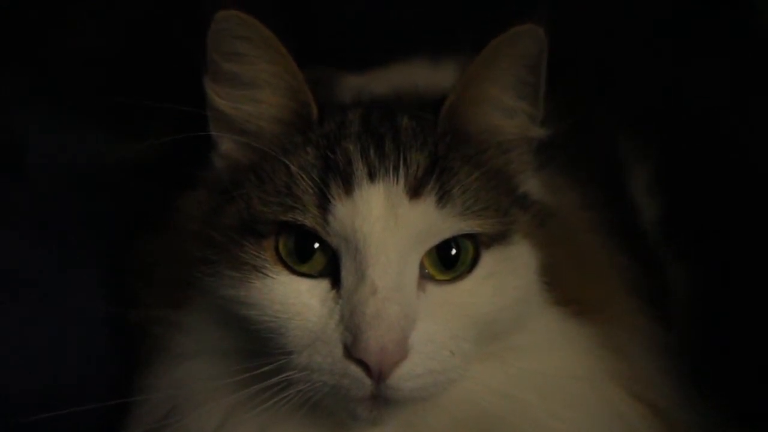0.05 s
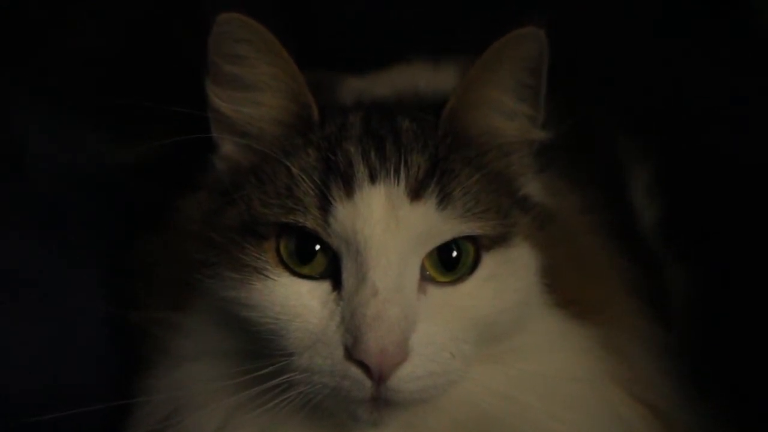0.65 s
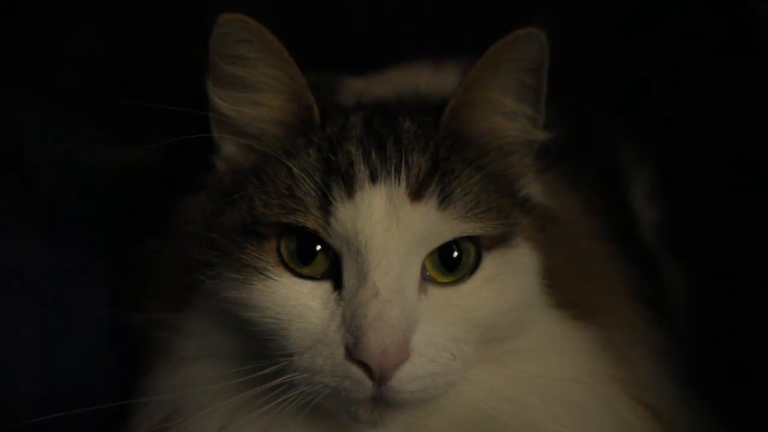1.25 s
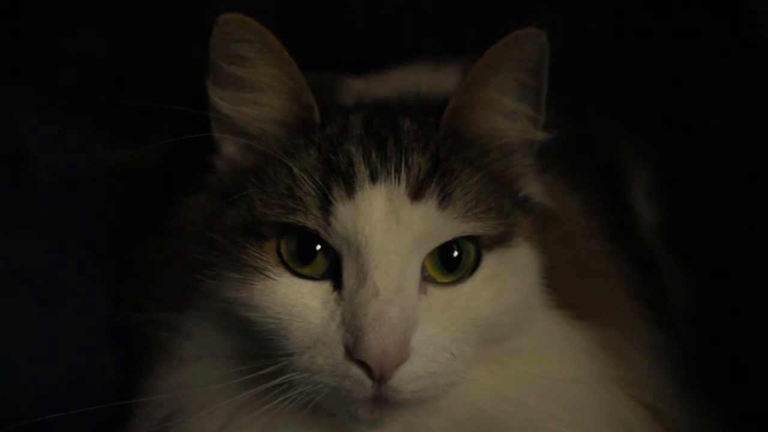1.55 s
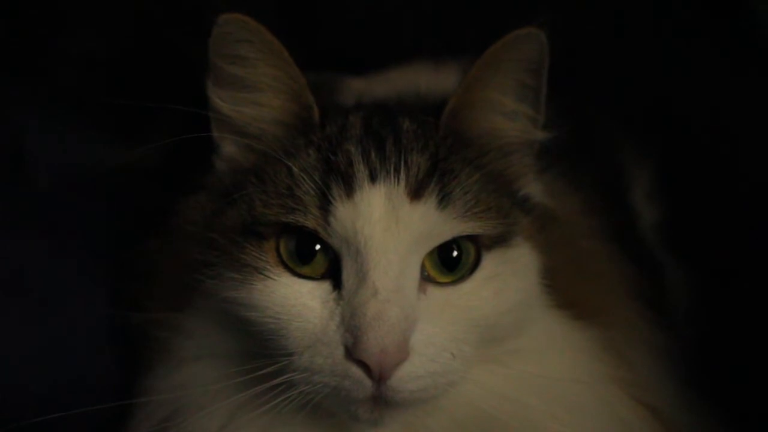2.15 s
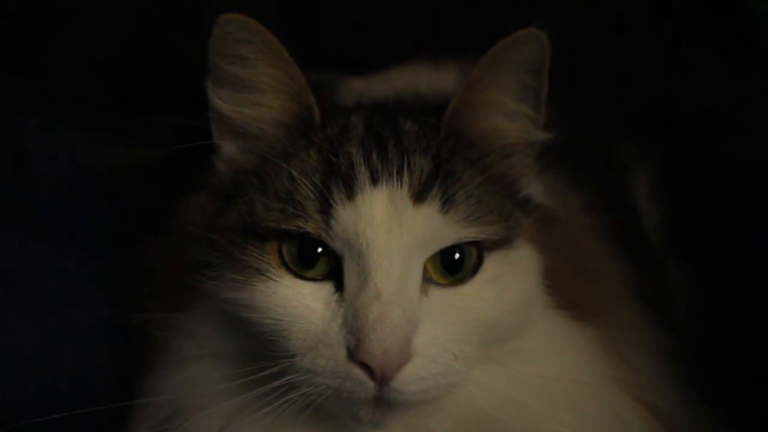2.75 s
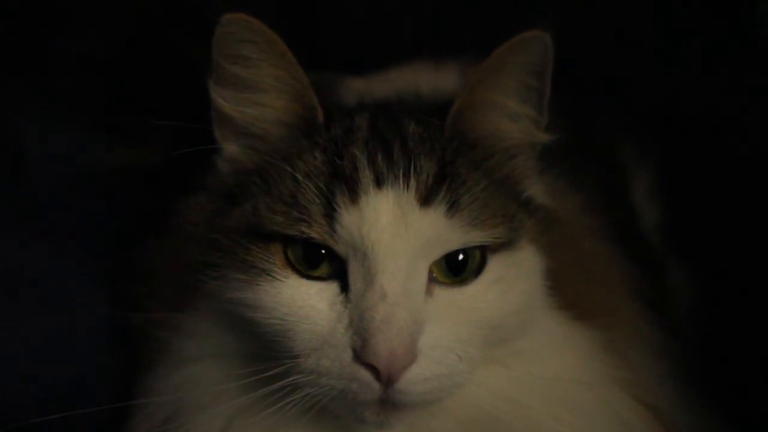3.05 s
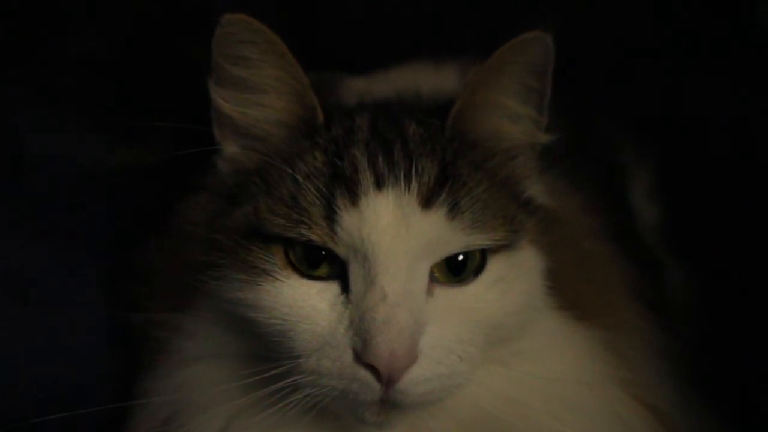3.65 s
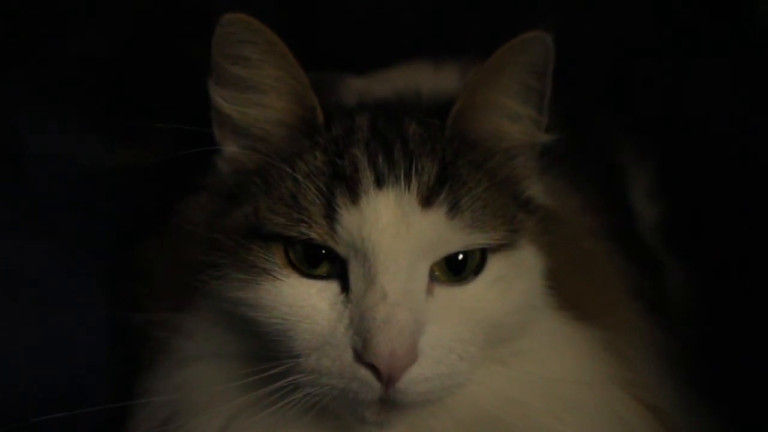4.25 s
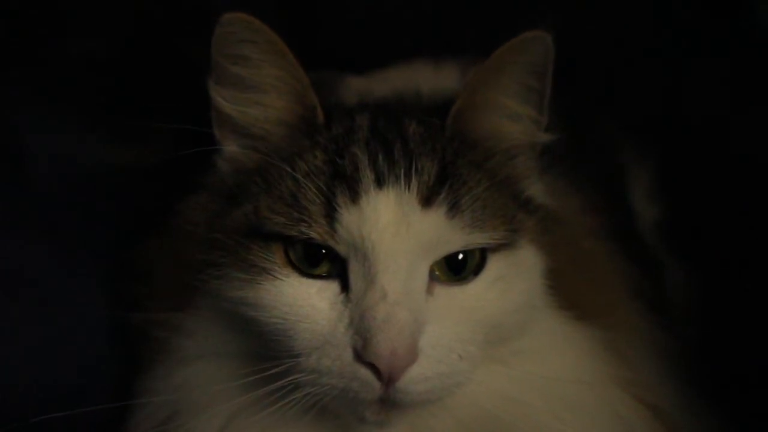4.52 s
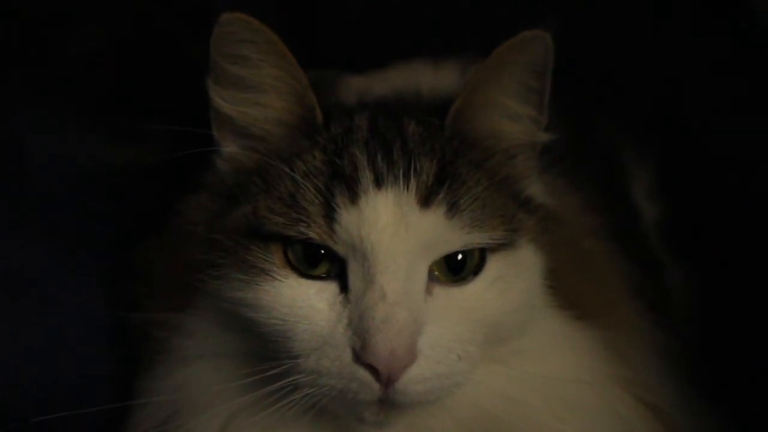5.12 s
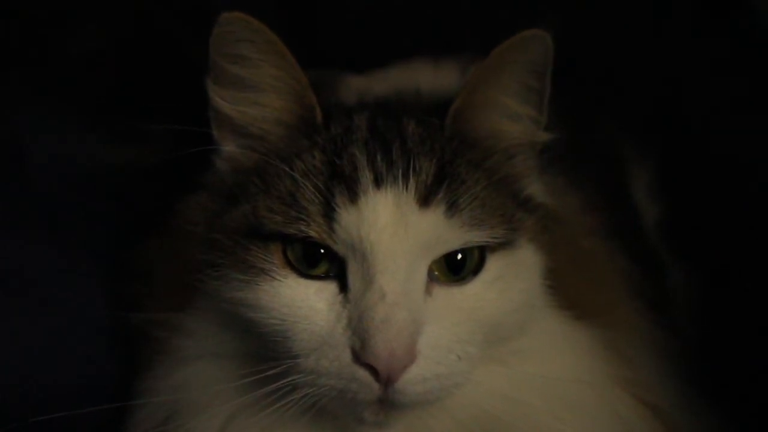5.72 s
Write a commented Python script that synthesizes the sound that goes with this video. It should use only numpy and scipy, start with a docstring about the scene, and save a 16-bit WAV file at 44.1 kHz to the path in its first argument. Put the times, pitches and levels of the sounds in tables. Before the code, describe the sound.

A nighttime chorus of crickets outdoors, with one nearby insect pulsing quickly on the right and distant insects sizzling behind.

```python
"""Crickets on a still night

Tree crickets chirp with their wings near 2.2 kHz and an octave above; one close on the right pulses
about eight times a second among steadier trills. A far crowd of insects merges into a sizzle around
8 kHz, and a katydid's wing strokes tick very high in two bouts. Faint peeps, scratchy calls and a few
tiny snaps sit over a low rumble of air."""
import sys
import numpy as np
from scipy import signal
from scipy.fft import rfft, irfft
from scipy.io import wavfile

SR = 44100
rng = np.random.default_rng(int(sys.argv[2]) if len(sys.argv) > 2 else 0)


def waveform_to_disk(signal):
    """Save audio, clipped to [-1, 1], as 16-bit WAV at the path in sys.argv[1]."""
    frames = np.transpose(np.atleast_2d(signal))
    scaled = np.clip(frames, -1, 1) * 32767
    samples = np.round(scaled).astype(np.int16)
    wavfile.write(sys.argv[1], SR, samples)


N = 254898
TIME = np.arange(N) / SR
BIN_HZ = np.maximum(np.fft.rfftfreq(N, 1 / SR), 1)

# Levels are relative, ahead of each layer's gain; pan is left minus right.
# stereo image of the noise beds: f/Hz, left-right correlation
STEREO_LIKENESS = [(12, 0.77), (30, 0.65), (80, 0.48), (160, 0.059), (1300, 0.18), (1750, 1), (2200, 0.52),
                   (2600, 1), (3600, 0.98), (4250, 0.54), (5000, 0.11), (6500, 0.14), (7400, 0.35),
                   (10000, 0.14), (15000, 0.026)]
# colours of the air's rumble, the hush and the far sizzle: f/Hz, level/dB
AIR_COLOUR = [(6, 0), (15, 2.5), (30, -1.5), (50, -6.5), (63, -9), (80, -15.5), (120, -21), (180, -25.5),
              (300, -28), (600, -33), (1200, -38), (1800, -37.5)]
HUSH_COLOUR = [(150, -12), (400, -1), (1000, 4), (1500, -3.5), (2600, -37), (3300, -34), (8000, -6),
               (15500, -1)]
SIZZLE_COLOUR = [(3700, -62), (4700, -19.5), (5200, -18), (6000, -10.5), (6550, -6.5), (7000, -5.5),
                 (7600, -0.8), (8100, 0), (8700, -2), (9300, -9.5), (10000, -16.5), (11300, -26),
                 (13000, -37.5), (15500, -38.5)]
# fader rides of the rumble and the sizzle: t/s, level/dB
AIR_RIDE = [(0, -51), (.6, -53), (1.2, -52.5), (2.2, -53), (3.3, -52.5), (4.2, -51.5), (5.0, -53.5),
            (5.78, -52)]
SIZZLE_RIDE = [(0.0, -39.5), (0.03, -41), (5.52, -41), (5.78, -40)]
# swell of the cricket chorus: t/s, fundamental level/dB, octave level/dB, pitch rise/Hz
CHORUS_SWELL = [(0, -55.5, -57, 0), (.4, -60, -58.5, -25), (1.0, -59.5, -70, -35), (1.6, -60, -58.5, -35),
                (2.1, -58.5, -54, -20), (2.5, -56, -52, 10), (3.0, -55.5, -51, 25), (3.5, -54, -51, 25),
                (3.9, -55, -52.5, 10), (4.3, -57.5, -55, -15), (4.9, -57.5, -56.5, -20),
                (5.4, -57, -55.5, -5), (5.78, -55.5, -56.5, 9)]
# colours of the chorus's two bands: f/Hz, level/dB
CHORUS_LOW_COLOUR = [(1500, -29), (1680, -20), (1830, -8.5), (1970, -9), (2100, -0.5), (2230, 3.5),
                     (2320, -4.5), (2420, -15.5), (2700, -16.5), (3000, -23)]
CHORUS_OCTAVE_COLOUR = [(3600, -107), (3780, -8.5), (3950, -8), (4120, -1.5), (4300, 1.5), (4420, 6.5),
                        (4520, -6.5), (4620, -7.5), (4760, -7), (5200, -50)]
# distant peeps: t/s, level/dB, f/Hz, half length/s
FAR_PEEPS = [(1.973, -59, 3640, 0.09), (2.69, -56, 3450, 0.021), (2.89, -67, 3460, 0.049),
             (3.42, -58, 3420, 0.024), (3.56, -66, 3470, .025)]
# distant scratchy calls: t/s, level/dB, half length/s
FAR_SCRATCHES = [(0.175, -57.5, 0.037), (0.46, -68, 0.15), (0.79, -61, 0.018), (0.873, -63, 0.081),
                 (2.05, -68, 0.014), (2.75, -59, 0.029), (5.271, -62, 0.05), (5.43, -69, 0.063),
                 (5.622, -60.5, 0.066)]
# colour of those calls: f/Hz, level/dB
SCRATCH_COLOUR = [(2500, -30), (2900, -3.5), (3300, -5), (3600, 3.5), (3850, -29)]
# tiny snaps: t/s, level/dB
SNAPS = [(4.344, -52), (4.671, -46), (4.676, -49), (5.1363, -53)]
# colour of the katydid's rasp: f/Hz, level/dB
KATYDID_COLOUR = [(9500, -22), (11000, -11), (11400, -5), (11750, -9), (12100, -10), (12500, -6),
                  (12850, -12), (14500, -31)]
# its bouts: start/s, end/s, first stroke period/s, level/dB, fade-in/s
STROKE_BOUTS = [(-0.019, 1.22, 0.04335, -42.5, 0.02), (3.994, 5.21, 0.04414, -41, 0.26)]
# four trills (clear; lower and soft; thin and high; joining late): t/s, f/Hz, level/dB, pan/dB
TRILL_CLEAR = [(0, 4420, -67, -1), (.4, 4425, -48, -7), (.55, 4440, -48.5, -8), (.9, 4435, -44, -5),
               (1.5, 4400, -46, -8.5), (2.1, 4385, -51.5, -10), (2.4, 4370, -69, -14), (4.0, 4370, -61, 4),
               (4.25, 4390, -48, 8), (4.6, 4385, -53, 9), (4.8, 4360, -53, 12), (5.4, 4345, -54, 5),
               (5.78, 4315, -48.5, 1)]
TRILL_SOFT = [(0, 4200, -59, -16), (.18, 4216, -50.5, -6), (.3, 4180, -63, 3), (.55, 4120, -58, -6),
              (1.0, 4146, -52, 2), (1.5, 4080, -69, -2), (2.2, 4150, -69, -1), (2.8, 4200, -57, -7),
              (3.7, 4230, -49.5, -2), (4.2, 4080, -61, -2), (5.3, 4190, -61.5, -16), (5.78, 4200, -69, 0)]
TRILL_THIN = [(0, 4710, -76, -3), (1.2, 4500, -74, -6), (4.08, 4600, -67, 0), (4.17, 4730, -58, -4),
              (4.62, 4717, -56, -11), (4.8, 4603, -61, 0), (5.78, 4630, -78, 0)]
TRILL_LATE = [(0, 4620, -83, 10), (4.6, 4615, -69, 11), (4.76, 4600, -57, -14), (5.3, 4600, -57.5, -3),
              (5.48, 4550, -54, -7), (5.58, 4460, -53, -11), (5.78, 4620, -51, 3.5)]
# phrasing of a far tree cricket and its lower, slower neighbour: t/s, level/dB, f/Hz
FAR_PHRASE = [(0.0, -61, 2240), (0.55, -47, 2213), (1.15, -43.5, 2213), (1.7, -48.0, 2190),
              (2.4, -48, 2205.0), (2.9, -46, 2230.0), (3.25, -46.5, 2288), (3.9, -45.5, 2286),
              (4.25, -49.0, 2234), (4.8, -47, 2241), (5.78, -50, 2225.0)]
LOW_PHRASE = [(0.0, -48.5, 2083), (0.7, -49, 2075.0), (1.4, -50, 2064), (1.95, -52.5, 2054),
              (2.4, -47.5, 2124), (2.9, -44, 2124), (3.4, -45.5, 2127), (3.85, -48.0, 2097),
              (4.25, -47.5, 2080.0), (4.7, -44, 2068), (5.2, -48.5, 2075.0), (5.78, -53, 2070)]
# phrasing of the close cricket: t/s, level/dB, f/Hz, pan/dB
CLOSE_PHRASE = [(0.12, -52, 4250, -3), (0.24, -41, 4290, -3), (0.35, -36, 4375, -6), (0.62, -44, 4425, -9),
                (0.8, -44, 4430, -10), (0.92, -37, 4425, -9), (1.2, -36.5, 4400, -8),
                (1.5, -37.5, 4400, -8), (1.78, -42, 4380, -10), (2.35, -37, 4360, -9),
                (3.4, -35.5, 4350, -5), (4.0, -38.5, 4350, -9), (4.6, -52, 4370, -2), (5.3, -48, 4355, 0),
                (5.7, -37.5, 4320, 2)]
# pace of these three; the farther two hurry as the chorus swells: t/s, chirp rate/Hz
FAR_PACE = [(0.0, 8.73), (0.55, 8.72), (1.15, 8.8), (1.7, 8.2), (2.4, 8.04), (2.9, 9.23), (3.25, 9.28),
            (3.9, 8.87), (4.25, 9.07), (4.8, 8.18), (5.78, 8.14)]
LOW_PACE = [(0.0, 8.12), (0.7, 7.65), (1.4, 6.88), (1.95, 6.85), (2.4, 8.94), (2.9, 8.22), (3.4, 8.14),
            (3.85, 6.71), (4.25, 8.41), (4.7, 6.71), (5.2, 7.0), (5.78, 7.22)]
CLOSE_PACE = [(0.92, 8.97), (1.25, 8.63), (1.8, 8.29), (3.4, 8.17), (4.0, 8.42), (4.6, 8.38), (5.3, 8.2)]
# colour of the scrape around the close cricket's tone: f/Hz, level/dB
SCRAPE_COLOUR = [(3800, -18), (4000, 14), (4200, -5), (4500, 7), (4650, 4), (4800, -19)]


def from_db(db):
    """Decibels to gain."""
    return 10 ** (np.asarray(db) / 20)


def unit_rms(x):
    """Scale to unit power."""
    return x / np.sqrt(np.mean(x ** 2) + 1e-20)


def in_time(rows):
    """Each column of an automation curve at every sample."""
    s, *columns = np.transpose(rows)
    return [np.interp(TIME, s, column) for column in columns]


def per_bin(points):
    """A curve over frequency, joined on a log axis."""
    hz, value = np.transpose(points)
    return np.interp(np.log(BIN_HZ), np.log(hz), value)


def panned(pan_db):
    """Left and right gains; positive leans left."""
    return from_db(np.array([[.5], [-.5]]) * pan_db)


def bump(s, half_s):
    """A bell-shaped swell of height 1."""
    return np.exp(-.5 * np.minimum(((TIME - s) / half_s) ** 2, 100))


def drift(rate_hz):
    """A random modulator of spread 1, moving mostly below the given rate."""
    return unit_rms(irfft(rfft(rng.standard_normal(N)) / (1 + (BIN_HZ / rate_hz) ** 2), N))


def wash(colour):
    """Stereo noise of unit power, rolled off past both ends of its colour curve."""
    mid, side = rfft(rng.standard_normal((2, N)))
    alike = np.clip(per_bin(STEREO_LIKENESS), -.98, .98)
    pair = np.sqrt(1 + alike) * mid + np.sqrt(1 - alike) * side * [[1], [-1]]
    low_hz, high_hz = np.array(colour)[[0, -1], 0]
    skirts = 1 / np.sqrt((1 + (low_hz / BIN_HZ) ** 8) * (1 + (BIN_HZ / high_hz) ** 8))
    return unit_rms(irfft(pair * skirts * from_db(per_bin(colour)), N))


def raised(x, rise_hz):
    """Slide every pitch in a sound by a moving number of hertz."""
    return np.real(signal.hilbert(x) * np.exp(2j * np.pi * np.cumsum(rise_hz) / SR))


def roughened(x, flutter_db, slip_rad, rate_hz):
    """Uneven teeth on the wing's file shake the strength and phase of the tone."""
    flutter = from_db(flutter_db * drift(rate_hz))
    slip = np.exp(1j * slip_rad * drift(rate_hz))
    return np.real(signal.hilbert(x) * flutter * slip)


def garden(x, wet_db, t60_s, width):
    """Walls and foliage scatter a short tail, partly different in each ear."""
    t = TIME[:SR // 2]
    mid, side = rng.standard_normal((2, len(t)))
    tail = (mid + width * side * [[1], [-1]]) * from_db(-60 * t / t60_s) * (t > .012)  # pre-delay
    tail /= np.sqrt(np.sum(tail ** 2, axis=1, keepdims=True))
    return x + from_db(wet_db) * signal.fftconvolve(x, tail, axes=1)[:, :N]


def chirp(s, peak_db, hz, half_s, skirt, sag_hz):
    """A burst of wing tone: a strong core between weaker strokes, sagging in pitch as the wing slows."""
    out = np.zeros(N)
    span = slice(max(0, int((s - .1) * SR)), int((s + .1) * SR))
    t = (TIME[span] - s) / half_s
    swell = (np.exp(-.5 * t ** 2) + skirt * np.exp(-.5 * (t / 1.5) ** 2)) / (1 + skirt)
    pitch = hz - sag_hz * np.tanh(t)
    out[span] = from_db(peak_db) * swell * np.sin(2 * np.pi * (np.cumsum(pitch) / SR + rng.random()))
    return out


def chirp_train(phrase, pace, first_s, uneven_db, stray_hz):
    """One chirp per beat, each a little different: rows of t/s, level/dB, f/Hz."""
    rate, = in_time(pace)
    level_db, hz, *_ = in_time(phrase)
    beats = np.cumsum(rate) / SR
    beats -= np.interp(first_s, TIME, beats)
    s = np.interp(np.arange(np.ceil(beats[-1])), beats, TIME)
    chance = rng.standard_normal((len(s), 2))
    peak_db = np.interp(s, TIME, level_db) + uneven_db * chance[:, 0]
    pitch_hz = np.interp(s, TIME, hz) + stray_hz * chance[:, 1]
    return np.transpose([s, peak_db, pitch_hz])


def night_air():
    """The bed: a low rumble of moving air and a soft, even hush."""
    level_db, = in_time(AIR_RIDE)
    return from_db(level_db + 3.5) * wash(AIR_COLOUR) + from_db(-68) * wash(HUSH_COLOUR)


def sizzle():
    """A far crowd of high-pitched insects merges into one shimmering band."""
    level_db, = in_time(SIZZLE_RIDE)
    return from_db(level_db + 2 + .37 * drift(40)) * wash(SIZZLE_COLOUR) * panned(1.15)


def chorus():
    """Many crickets blur into two throbbing bands an octave apart, rising in pitch as they swell."""
    low_db, octave_db, rise_hz = in_time(CHORUS_SWELL)
    low = from_db(low_db - .7 + 2.4 * drift(23)) * raised(wash(CHORUS_LOW_COLOUR), rise_hz)
    octave = from_db(octave_db + 2.5 + drift(25)) * raised(wash(CHORUS_OCTAVE_COLOUR), 2 * rise_hz)
    return low * panned(-1.1) + octave * panned(.5)


def faint_callers():
    """Wavering peeps and short scratchy calls from far away."""
    peeps = sum(chirp(s, db, hz, half_s, skirt=.07, sag_hz=17) for s, db, hz, half_s in FAR_PEEPS)
    bursts = sum(from_db(db) * bump(s, half_s) for s, db, half_s in FAR_SCRATCHES)
    scratches = bursts * from_db(2.4 * drift(36) - 3.5) * wash(SCRATCH_COLOUR)
    calls = roughened(peeps, flutter_db=5.5, slip_rad=.96, rate_hz=27) + scratches
    return from_db(-2) * garden(calls, wet_db=-12, t60_s=.81, width=.2)


def snaps(gain_db=7, decay_s=.0006):
    """Tiny dry snaps, heard only in the top octave."""
    envelope = sum(from_db(db) * (TIME > s) * np.exp(-np.abs(TIME - s) / decay_s) for s, db in SNAPS)
    top = signal.butter(2, 10500, "high", fs=SR, output="sos")
    return from_db(gain_db) * panned(2) * signal.sosfilt(top, envelope * rng.standard_normal(N) + 1e-18)


def katydid_strokes(uneven_db=1.2, soft_start_db=9, tiring_db_per_s=3.5, slowing_s=.00015):
    """In each bout the wing strokes swell, then weaken, slowing all along: rows of t/s, level/dB."""
    strokes = []
    for start_s, end_s, period_s, peak_db, swell_s in STROKE_BOUTS:
        age_s = 0
        while start_s + age_s < end_s:
            loss_db = soft_start_db * max(0, 1 - age_s / swell_s) + tiring_db_per_s * age_s
            strokes.append((start_s + age_s, peak_db - loss_db + uneven_db * rng.standard_normal()))
            age_s += period_s
            period_s += slowing_s
    return strokes


def katydid(gain_db=-9, rise_s=.0062, stop_s=.0039, crest_s=.001, lead_s=.000016):
    """Each wing stroke is a very high rasp that swells, stops short and reaches the left ear first."""
    envelope = np.zeros(N)
    for s, db in katydid_strokes():
        half_s = np.where(TIME < s + crest_s, rise_s, stop_s)
        envelope += from_db(db) * bump(s + crest_s, half_s)
    left = envelope * wash(KATYDID_COLOUR)[0]
    right = irfft(rfft(left) * np.exp(-2j * np.pi * BIN_HZ * lead_s), N)
    rasp = panned(2.5) * np.array([left, right])
    return from_db(gain_db) * garden(rasp, wet_db=-6, t60_s=.2, width=1)


def trill(phrase, throb_hz, depth):
    """A near-continuous tone that throbs as the wings open and close."""
    hz, level_db, pan_db = in_time(phrase)
    throb = 1 + depth * np.sin(2 * np.pi * np.cumsum(throb_hz + .48 * drift(3.3)) / SR)
    tone = np.sin(2 * np.pi * np.cumsum(hz + 14 * drift(38.9)) / SR)
    return panned(pan_db) * from_db(level_db) * throb * tone


def trilling_crickets():
    """Four steadier singers at different distances."""
    song = trill(TRILL_CLEAR, throb_hz=12, depth=.099) + trill(TRILL_SOFT, throb_hz=9, depth=1)
    song += trill(TRILL_THIN, throb_hz=8.6, depth=.75) + trill(TRILL_LATE, throb_hz=8.9, depth=.61)
    song = roughened(song, flutter_db=2.4, slip_rad=.15, rate_hz=110)
    return from_db(-4.5) * garden(song, wet_db=-4, t60_s=.66, width=.91)


def tree_cricket(chirps, gain_db, octave_db, pan_db):
    """The wings ring at their fundamental and an octave above it."""
    low = sum(chirp(s, db, hz, half_s=.013, skirt=.62, sag_hz=8.4) for s, db, hz in chirps)
    high = sum(chirp(s, db + octave_db, 2 * hz, half_s=.014, skirt=.17, sag_hz=13.4)
               for s, db, hz in chirps)
    return from_db(gain_db) * panned(pan_db) * (low + high)


def tree_cricket_pair():
    """Two callers at neighbouring pitches, left and right, drift in and out of step."""
    far_chirps = chirp_train(FAR_PHRASE, FAR_PACE, first_s=.093, uneven_db=.6, stray_hz=7.03)
    far = tree_cricket(far_chirps, gain_db=-6, octave_db=-6, pan_db=4)
    low_chirps = chirp_train(LOW_PHRASE, LOW_PACE, first_s=.048, uneven_db=1.6, stray_hz=8.84)
    low = tree_cricket(low_chirps, gain_db=-6.5, octave_db=.5, pan_db=-4)
    duet = roughened(far + low, flutter_db=-.1, slip_rad=.07, rate_hz=160)
    return garden(duet, wet_db=-5.5, t60_s=.59, width=.43)


def close_cricket(pulse_half_s=.013, build_half_s=.031, build=.2, build_lead_s=.011, scrape_db=-20):
    """The lead voice: one wing tone that builds into each pulse, with the file scraping under it."""
    swell = np.zeros(N)
    for s, db, _ in chirp_train(CLOSE_PHRASE, CLOSE_PACE, first_s=.2419, uneven_db=.7, stray_hz=0):
        pulse = bump(s, pulse_half_s) + build * bump(s - build_lead_s, build_half_s)
        swell += from_db(db) * pulse / (1 + build)
    *_, hz, pan_db = in_time(CLOSE_PHRASE)
    tone = np.sin(2 * np.pi * np.cumsum(hz + 10 * drift(29.9)) / SR)
    flutter = from_db(.9 * drift(90))
    scrape = from_db(scrape_db) * wash(SCRAPE_COLOUR)[0]
    song = panned(pan_db) * swell * (tone * flutter + scrape)
    return from_db(-2.8) * garden(song, wet_db=-12, t60_s=.42, width=.7)


def scene():
    """The mix: all the insects and the air around them."""
    crickets = close_cricket() + tree_cricket_pair() + trilling_crickets() + chorus()
    return crickets + faint_callers() + katydid() + snaps() + sizzle() + night_air()


def record(dry, cutoff_hz=15750):
    """A steep high cut on the whole mix."""
    return signal.sosfilt(signal.ellip(12, .1, 80, cutoff_hz, fs=SR, output="sos"), dry)


dry = scene()
out = record(dry)
waveform_to_disk(out)
```